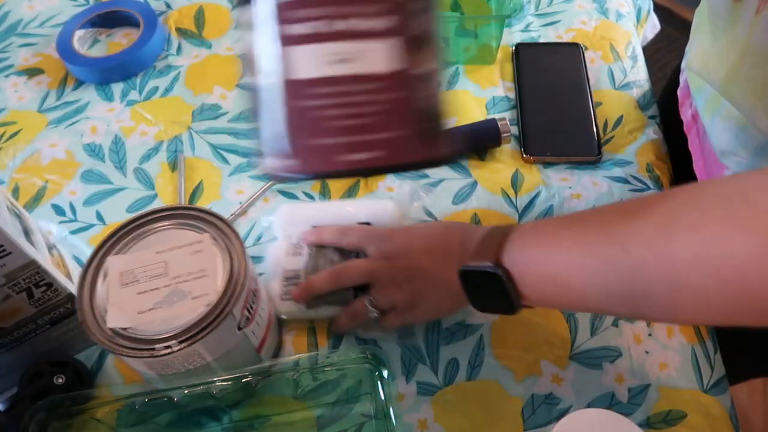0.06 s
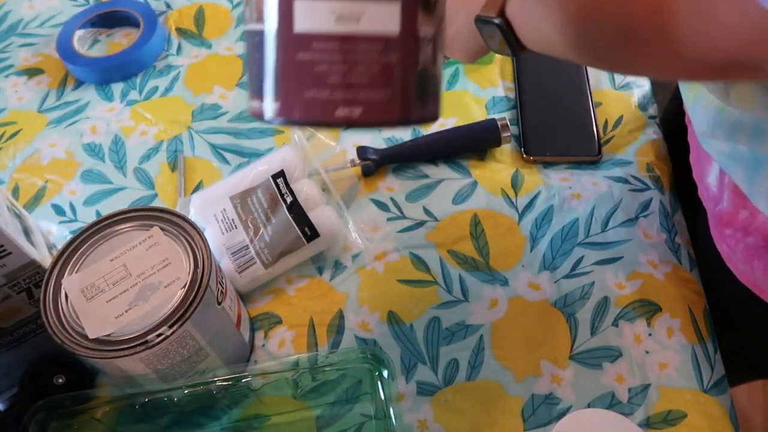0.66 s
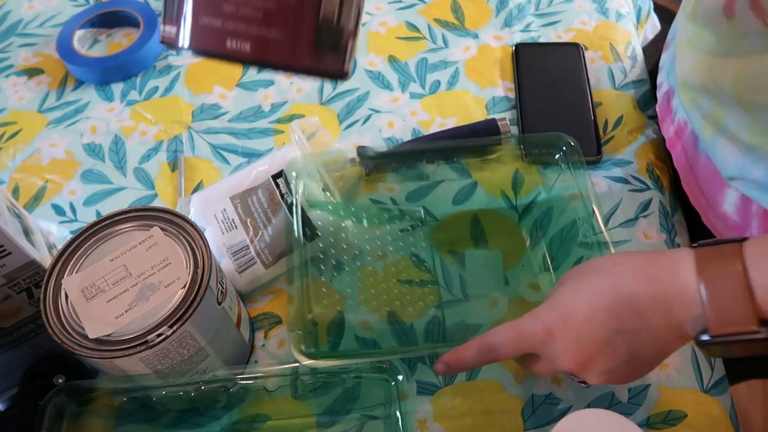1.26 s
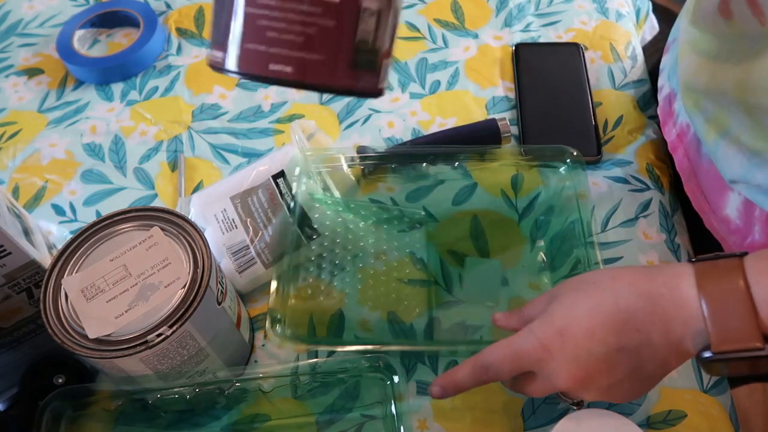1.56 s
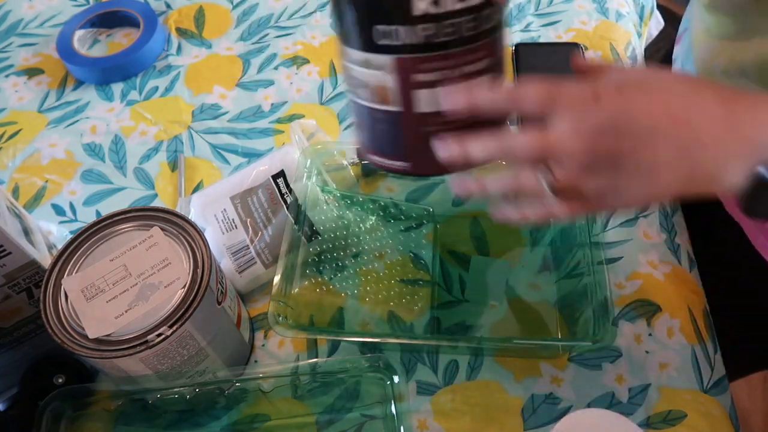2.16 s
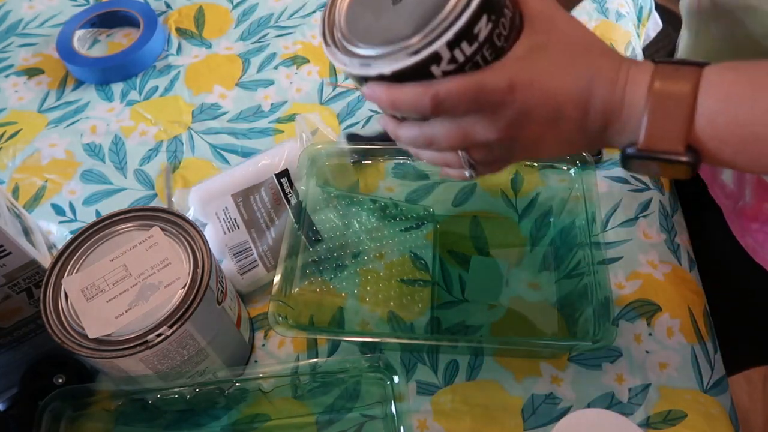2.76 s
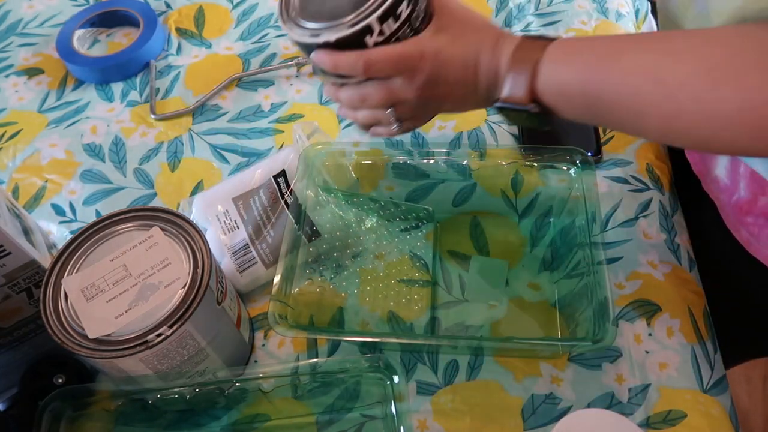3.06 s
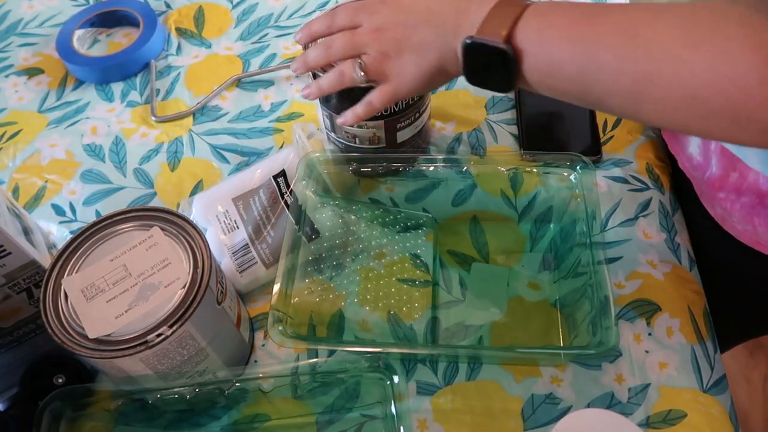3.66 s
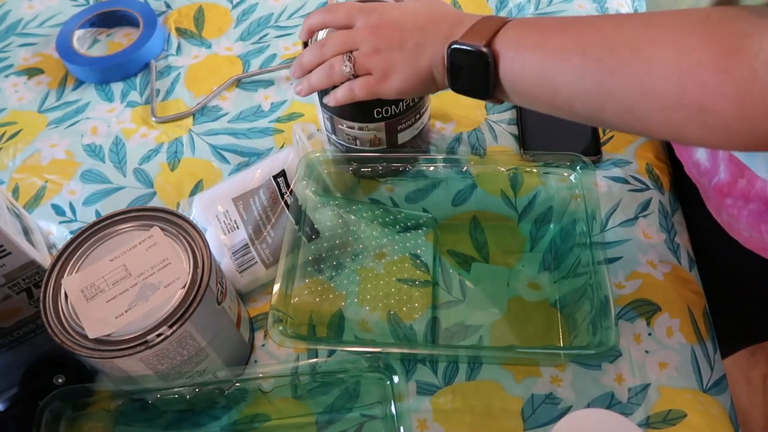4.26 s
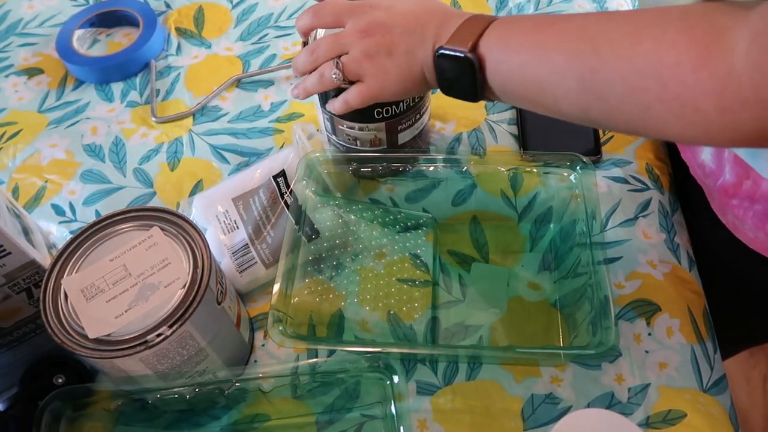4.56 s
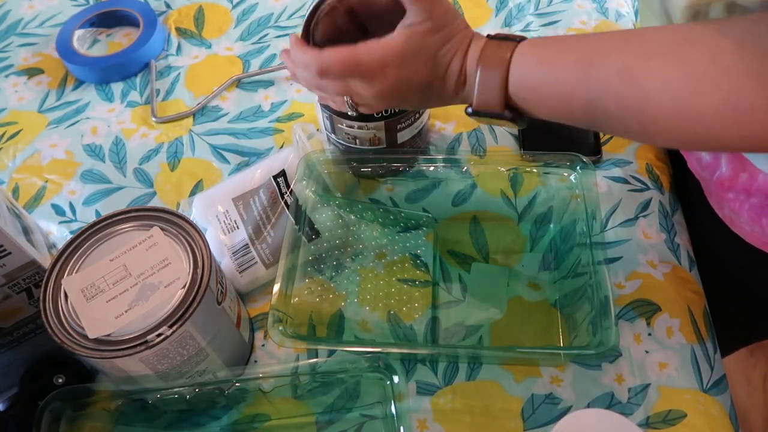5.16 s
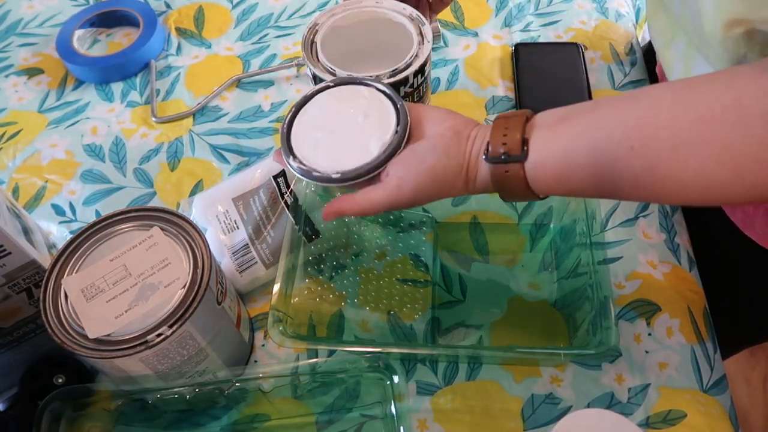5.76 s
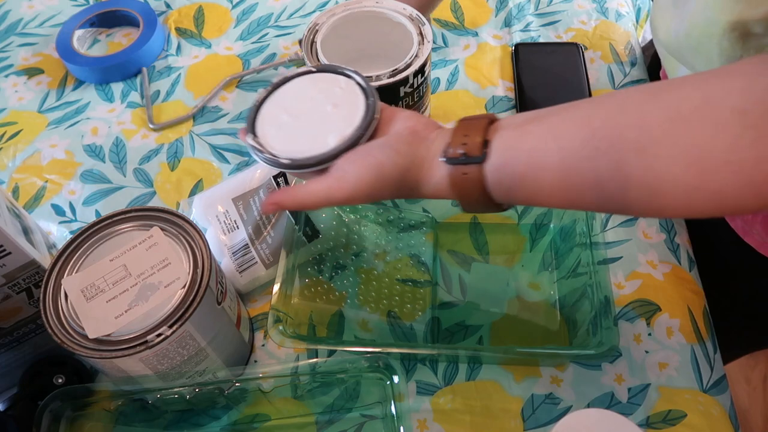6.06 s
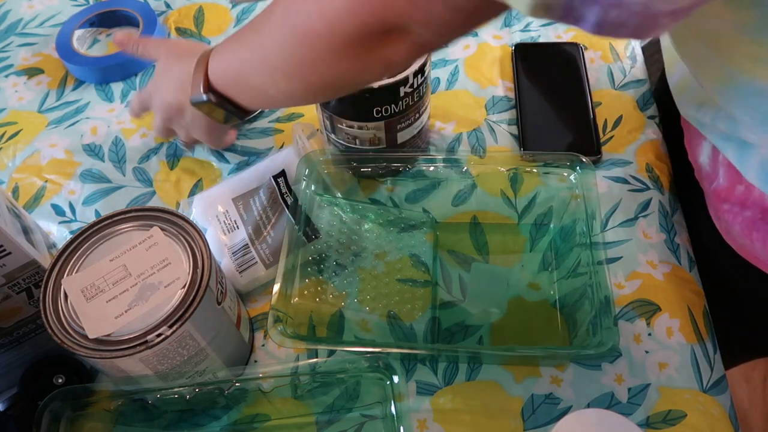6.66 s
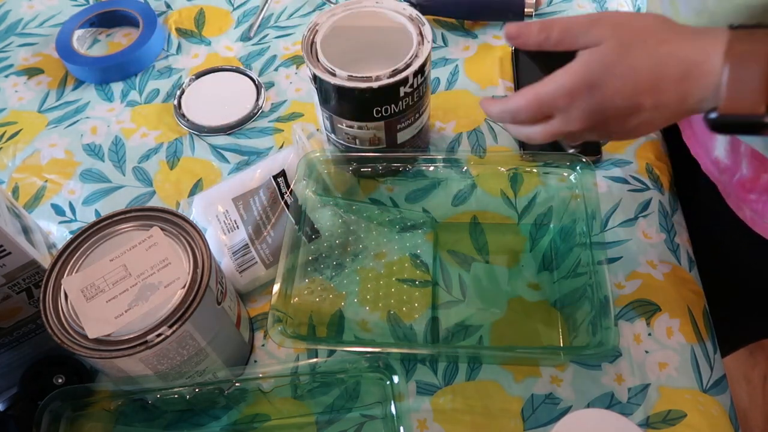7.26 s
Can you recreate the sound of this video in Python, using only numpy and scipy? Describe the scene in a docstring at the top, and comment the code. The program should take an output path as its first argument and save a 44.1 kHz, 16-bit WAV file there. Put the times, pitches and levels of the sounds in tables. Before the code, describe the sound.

For the first second, a wrapped pack scrapes and taps across a cloth-covered table. At about 1.2 seconds a thin plastic tray drops, chatters and rocks to rest by 2 seconds. A full paint can is gripped with dull metal knocks from 2.3 seconds, drags briefly, and lands with a heavy thud near 3.3 seconds. From 3.8 seconds a screwdriver clicks and scrapes under the rim, giving three snaps at about 4.3, 4.5 and 4.7 seconds, the last with a loud, hollow pop. The thin metal lid creaks faintly, then rubs and rings as it is handled, clinking near 6 seconds and settling on the table at 6.7. Around 7.2 seconds the screwdriver clatters loudly down, thumping the tabletop. Everything is close, in a small room, with soft sleeve rustle and a faint, wavering low hum underneath.

```python
"""Opening a paint can

On a cloth-covered table in a small room, a wrapped pack is pushed aside, a thin plastic tray drops
and rocks, and a full paint can is set down. Its lid is prised open with three snaps and a pop, handled
and laid aside; the screwdriver clatters down. Contacts click and ring each object's modes, rubbed
metal sings, heavy blows swing the table top. A low hum wavers underneath."""
import sys
import numpy as np
from scipy import signal
from scipy.fft import rfft, irfft
from scipy.io import wavfile
from scipy.ndimage import uniform_filter1d, minimum_filter1d

SR = 44100
rng = np.random.default_rng(int(sys.argv[2]) if len(sys.argv) > 2 else 0)


def dump(signal):
    """Clip the signal to [-1, 1] and save it as 16-bit WAV at the path in sys.argv[1]."""
    limited = np.clip(np.atleast_2d(signal).T, -1, 1)
    pcm = np.round(limited * 32767).astype(np.int16)
    wavfile.write(sys.argv[1], SR, pcm)


N = 331632
TIME = np.arange(N) / SR


def amp(db):
    """Decibels to gain."""
    return 10 ** (np.asarray(db) / 20)


def unit(x):
    """Scales to unit rms."""
    return x / np.sqrt(np.mean(x ** 2) + 1e-20)


def read(points, hz):
    """Interpolates on a log-frequency axis."""
    freq_hz, value = np.transpose(points)
    return np.interp(np.log(hz + 1), np.log(freq_hz + 1), value)


def add(mix, start_s, sound):
    """Mixes a sound in at start_s."""
    part = mix[max(round(start_s * SR), 0):][:len(sound)]
    part += sound[:len(part)]


def colour(x, spectrum):
    """Zero-phase filter from (freq_hz, gain_db) points."""
    return irfft(rfft(x) * amp(read(spectrum, np.fft.rfftfreq(len(x), 1 / SR))), len(x))


def causal(x, gain_db):
    """Minimum-phase filter: nothing precedes the attack."""
    response = np.exp(np.conj(signal.hilbert(np.log(amp(gain_db)))))
    return np.fft.ifft(np.fft.fft(x) * response).real


def whiten(x, span_hz):
    """Flattens broad bands, keeps fine peaks and dips."""
    bins = rfft(x)
    power = uniform_filter1d(abs(bins) ** 2, max(int(span_hz * len(x) / SR), 1))
    return irfft(bins / np.sqrt(abs(power) + 1e-12), len(x))


# Room noise spectrum: freq_hz, level_db
AIR_SPECTRUM = [(15, -50), (25, -10), (76, -8.5), (141, -6), (170, -11.5), (263, -16.5), (439, -20),
                (988, -27.5), (1100, -28.5), (1440, -29), (2610, -33.5), (12500, -51), (16000, -60)]


def air(level_db=-51):
    """Still room: low rumble under faint hiss."""
    return amp(level_db) * unit(colour(rng.standard_normal(N), AIR_SPECTRUM))


# Electrical whine: pitch_hz, level_db
WHINE_TONES = [(13006, -84)]


def whine():
    """Thin, steady electrical tone."""
    return sum(amp(db) * np.sqrt(2) * np.sin(2 * np.pi * hz * TIME) for hz, db in WHINE_TONES)


# Hum envelope: time_s, level_db
HUM_LEVELS = [(0.0, -44.5), (0.54, -46.5), (1.05, -38), (1.36, -48), (1.72, -40), (2.3, -51), (3.18, -44),
              (3.47, -54), (4.29, -59.5), (4.63, -47.5), (4.98, -47.5), (5.36, -60), (5.7, -53.5),
              (5.95, -44.5), (6.74, -53.5), (7.52, -46)]


def hum(pitch_hz=170.5, waver_hz=2):
    """Low hum that swells, fades and wavers."""
    drift = unit(colour(rng.standard_normal(N), [(6, 0), (25, -30), (100, -90)]))
    envelope = amp(np.interp(TIME, *np.transpose(HUM_LEVELS)))
    phase = 2 * np.pi * np.cumsum(pitch_hz + waver_hz * drift) / SR
    return envelope * np.sqrt(2) * np.sin(phase)


# Reverb decay: freq_hz, t60_s
ROOM_DECAY = [(100, 0.14), (400, 0.35), (1000, 0.33), (3000, 0.47), (7000, 0.32), (14000, 0.27)]
# Reverb tail against direct sound: freq_hz, gain_db
ROOM_SPECTRUM = [(100, 0.5), (300, 1.5), (1000, -7), (2000, -19), (5000, -9.5), (12000, -21)]


def room(x, early_db=-8, early_decay_s=0.03, echoes_per_s=4000):
    """Quick table-top reflections, then a small room's tail."""
    t = np.arange(SR * 3 // 4) / SR
    late, early = rng.standard_normal((2, len(t))) * (rng.random((2, len(t))) < echoes_per_s / SR)
    hz, frame_s, frames = signal.stft(late, SR, nperseg=256)
    decay = amp(-60 * frame_s / read(ROOM_DECAY, hz)[:, None])
    tail = signal.istft(frames * decay, SR, nperseg=256)[1][:len(t)]
    onset = np.clip((t - .004) / 0.0041, 0, 1)
    tail = colour(whiten(tail * onset, span_hz=64.4), ROOM_SPECTRUM)
    early = amp(early_db) * whiten(early * (t > .002) * np.exp(-t / early_decay_s), span_hz=240)
    return signal.fftconvolve(x, (tail + early)[:SR * 2 // 3])[:N]


def ring(modes, size=SR // 3):
    """Free ringing: a sum of decaying modes."""
    t = np.arange(size) / SR
    return sum(amp(db - 60 * t / t60_s) * np.sin(2 * np.pi * hz * t) for hz, db, t60_s in modes)


def friction(slips_per_s, spread_db, hiss_gain, size=N):
    """Tiny uneven slips over smooth hiss."""
    slipping = rng.random(size) < slips_per_s / SR
    strength = amp(spread_db * np.minimum(rng.exponential(1, size), 4))
    slips = slipping * strength * rng.choice([-1, 1], size)
    return unit(unit(slips) + hiss_gain * rng.standard_normal(size))


def stick_slip(depth_db, rate_hz):
    """A dragged thing holds and lets go, so its level clumps."""
    knots_s = np.arange(0, N / SR + 1, 1 / rate_hz)
    return unit(amp(depth_db * np.interp(TIME, knots_s, rng.standard_normal(len(knots_s)))))


def push(start_s, length_s, attack_s=0.042, release_s=0.068):
    """Movement envelope: gathers speed, holds, comes to rest."""
    rise = np.clip((TIME - start_s) / attack_s, 0, 1)
    return rise * np.exp(-np.maximum(TIME - start_s - length_s, 0) / release_s)


# Arm movements: start_s, length_s, level_db
SLEEVE_MOVES = [(0, 2.95, -59.5), (4.06, 2.91, -60), (6.975, 0.6, -58)]


def sleeves():
    """Cloth rustles as the arms move."""
    spectrum = [(150, 2), (500, -4.5), (1500, -7), (3000, -12.5), (6000, -21), (14000, -46)]
    rustle = unit(colour(friction(slips_per_s=930, spread_db=5.5, hiss_gain=0.97), spectrum))
    envelope = sum(amp(db) * push(start_s, length_s) for start_s, length_s, db in SLEEVE_MOVES)
    return rustle * stick_slip(depth_db=3.5, rate_hz=14) * envelope


def crinkles(low_hz=900, high_hz=4500, t60_cycles=14, count=500):
    """Plastic creases buckle, each with its own brief pitch."""
    out = np.zeros(N)
    for when, pitch, strength in rng.random((count, 3)):
        hz = low_hz * (high_hz / low_hz) ** pitch
        crease = ring([(hz, 12 * strength, t60_cycles / hz)], size=1024) / np.sqrt(hz)
        add(out, when * N / SR, crease)
    return unit(out)


def patchy(x, depth_db):
    """Contact points shift, so brief resonances come and go."""
    frames = signal.stft(x, nperseg=512, noverlap=384)[2]
    patches = uniform_filter1d(rng.standard_normal(frames.shape), size=5, axis=0)
    patches = unit(uniform_filter1d(patches, size=7, axis=1))
    return unit(signal.istft(frames * amp(depth_db * patches), nperseg=512, noverlap=384)[1][:len(x)])


# Drags over the cloth: start_s, length_s, body_db, hiss_db
CLOTH_SLIDES = [(-.05, 0.37, -35.5, -52), (0.738, 0.036, -39, -62), (2.759, 0.27, -42, -59.5),
                (6.631, 0.14, -46.5, -62)]
# Drag body spectrum: freq_hz, level_db
SLIDE_SPECTRUM = [(150, -23), (250, -9.5), (580, -14), (651, -5), (821, -10.5), (1010, -1.5), (1600, -7.5),
                  (1960, -7), (3070, -14), (8000, -27.5), (10400, -63.5), (17600, -120)]


def slides():
    """Things drag over the tablecloth with scrape, crinkle and hiss."""
    grain = friction(slips_per_s=1400, spread_db=4.2, hiss_gain=.75)
    grain *= stick_slip(depth_db=2.5, rate_hz=90)
    body = unit(patchy(colour(grain, SLIDE_SPECTRUM), depth_db=3.5) + .45 * crinkles())
    hiss = unit(colour(grain, [(2500, -11), (6500, -10), (12000, 1.5), (16000, -6.5)]))
    return sum(push(start_s, length_s) * (amp(body_db) * body + amp(hiss_db) * hiss)
               for start_s, length_s, body_db, hiss_db in CLOTH_SLIDES)


def touched(modes, detune=0.0024, spread_db=1):
    """Unit-energy ringing; grip and contact point shift each mode slightly."""
    shifts = rng.standard_normal((len(modes), 2))
    body = ring([(hz * (1 + detune * pitch_shift), db + spread_db * level_shift, t60_s)
                 for (hz, db, t60_s), (pitch_shift, level_shift) in zip(modes, shifts)])
    return body / np.linalg.norm(body)


def strikes(hits, spectrum, modes, ring_db, chatter_gain, size=4096):
    """Each contact clicks, chatters and sets the object ringing."""
    out, t, hz = np.zeros(N), np.arange(size) / SR, abs(np.fft.fftfreq(size, 1 / SR))
    grits = rng.standard_normal((len(hits), size))
    for (start_s, level_db, bass_db, treble_db, chatter_s), grit in zip(hits, grits):
        force = chatter_gain * grit * np.exp(-t / max(chatter_s, 1e-4))
        force[0] += 1
        force_db = 10 * np.log10(uniform_filter1d(abs(np.fft.fft(force)) ** 2, size=45, mode="wrap"))
        tilt = [(250, bass_db), (1900, 0), (10000, treble_db)]
        click = causal(force, read(spectrum, hz) + read(tilt, hz) - force_db)
        sound = amp(ring_db) * signal.fftconvolve(click, touched(modes))
        sound[:size] += click
        add(out, start_s, amp(level_db) * sound)
    return out


# Dry rubbing noise: freq_hz, gain_db
SCRAPE_SPECTRUM = [(200, -20), (800, 30.5), (1400, 8.5), (2200, 1), (3400, 7.5), (5400, -9.5), (8000, -4.5),
                   (15000, -4)]


def rubs(strokes, modes, scrape_db, size=16384):
    """Slips on thin metal swell and fade, feeding each mode its share; the modes ring on."""
    out, t, hz = np.zeros(N), np.arange(size) / SR, abs(np.fft.fftfreq(size, 1 / SR))
    rings = [ring([mode]) / np.linalg.norm(ring(modes)) for mode in modes]
    for start_s, length_s, level_db, treble_db in strokes:
        slips = friction(slips_per_s=1600, spread_db=2, hiss_gain=.6, size=size)
        slips *= np.sin(np.pi * np.minimum(t / length_s, 1))
        slips /= np.linalg.norm(slips)
        tilt = [(2000, 0), (5000, treble_db)]
        sound = 0
        for (mode_hz, _, _), ringing in zip(modes, rings):
            driven = signal.fftconvolve(slips, ringing)
            share = amp(read(tilt, mode_hz)) * np.linalg.norm(ringing)
            sound += share * driven / np.linalg.norm(driven)
        sound[:size] += causal(slips, scrape_db + read(SCRAPE_SPECTRUM, hz) + read(tilt, hz))
        add(out, start_s, amp(level_db) * np.sqrt(length_s * SR / 2) * sound)
    return out


def radiate(swing, rise_s=0.00096, low_cut_hz=90):
    """A small panel takes a moment to move and radiates little deep bass."""
    rise = 1 - np.exp(-np.arange(len(swing)) / SR / rise_s)
    return signal.sosfilt(signal.butter(2, low_cut_hz, "high", fs=SR, output="sos"), rise * swing)


# Weight landing on the table: start_s, level_db, pitch_hz, ring_db
TABLE_BLOWS = [(0.783, -19.5, 138, -19), (1.195, -14, 111, -9), (2.837, -14.5, 281, -15),
               (3.059, -7, 320, -21.5), (3.061, -15, 119, -4.5), (3.2941, 6.5, 272, -9),
               (3.348, -6, 225, -15), (4.52, -18.5, 224, -18), (6.698, -17.5, 278, -15),
               (6.708, -14, 173, -13), (7.2209, -10, 192, -7.5), (7.2556, -0.5, 297, -13),
               (7.41, -14, 310, -14.5)]
# Table-top modes: pitch_hz, level_db, t60_s
TABLE_MODES = [(107, -4, .18), (220, 2, .19), (292, -8, .17), (380, -11, .15), (490, -16, .16),
               (673, -22, .12)]


def table_thuds(t60_cycles=8):
    """Heavy blows swing the table top for a few cycles and leave it ringing."""
    out, ringing = np.zeros(N), ring(TABLE_MODES)
    for start_s, level_db, pitch_hz, ring_db in TABLE_BLOWS:
        swing = ring([(pitch_hz, 0, t60_cycles / pitch_hz)]) + amp(ring_db) * ringing
        add(out, start_s, amp(level_db) * radiate(swing))
    return out


# Pack contacts: start_s, level_db, bass_db, treble_db, chatter_s
PACK_HITS = [(.021, 2.5, 10, 20.5, 0.0058), (.04, 1, 9, -7, 0.0037), (.0868, 3, 3, -22, 0.0091),
             (.1836, 11, -22, -21, 0.0038), (.2412, 16.5, -1.5, 2, 0.0018), (.364, -13, 1, 27, 0.0037),
             (.378, -7, -2, 24, .003), (.4478, 0.5, 11, 8, 0.0097), (.5282, 11.5, -17, -7, 0.002),
             (.7268, 6, 9.5, -13, 0.017), (.8091, 4, 13.5, -20, 0.0074)]
# Pack click: freq_hz, gain_db
PACK_SPECTRUM = [(40, -29), (350, -14), (560, -2), (900, -7), (1400, -15), (2050, 2), (2600, -4),
                 (3300, -6), (4100, -25), (16000, -42)]
# Pack modes: pitch_hz, level_db, t60_s
PACK_MODES = [(550, 0, .035), (1950, 4, .04), (2300, 6, .022), (3030, 3, .025), (3420, 3, .02)]


def pack():
    """The wrapped pack taps and barely rings."""
    return strikes(PACK_HITS, PACK_SPECTRUM, PACK_MODES, ring_db=-18.5, chatter_gain=0.37)


# Tray contacts: start_s, level_db, bass_db, treble_db, chatter_s
TRAY_BOUNCES = [(1.1966, 23, 1.5, 14.5, 0.0026), (1.2025, 13.5, 8.5, -4, 0.0019),
                (1.2112, 13.5, 15, -12, 0.0047), (1.2255, 15.5, 2, -10, 0.0043), (1.2385, 0, 12, -16, .008),
                (1.2625, -2.5, 9, -14, 0.0045), (1.3173, 0, 6, 2, 0.0058), (1.3634, 16, -6.5, 3, 0.0026),
                (1.477, 11.5, -6, 1.5, 0.0064), (1.5814, 1, -7, -5, 0.033), (1.6768, 0.5, -36, -9, 0.007),
                (1.9038, 6.5, -43, 7.5, 0.018), (2.078, -24.5, -20, 35, 0.0016)]
# Tray click: freq_hz, gain_db
TRAY_SPECTRUM = [(40, -18.5), (270, -3.5), (400, 3.5), (800, 4.5), (1300, 0), (1900, 1), (4500, -21.5),
                 (16000, -54.5)]
# Tray modes: pitch_hz, level_db, t60_s
TRAY_MODES = [(107, 4, .12), (310, -7, .08), (355, -2, .07), (420, 6, .055), (565, -5, .09), (610, -4, .09),
              (655, -1, .08), (705, -1, .09), (790, 6, .11), (848, 6, .11), (965, 2, .1), (1114, 3, .07),
              (1650, -2, .05), (2300, -1, .07)]


def tray():
    """Thin plastic drops, chatters and rocks to rest."""
    return strikes(TRAY_BOUNCES, TRAY_SPECTRUM, TRAY_MODES, ring_db=-16, chatter_gain=0.84)


# Screwdriver contacts: start_s, level_db, bass_db, treble_db, chatter_s
TOOL_BOUNCES = [(7.0488, 0.34, -64, 8.5, 0.003), (7.2197, 33.2, -10, 2.5, 0.0013),
                (7.2226, 27, -11.5, -19, 0.0004), (7.233, 5.3, 10, -13, 0.0064),
                (7.243, 31.4, -0.5, -1, 0.0021), (7.2462, 23.2, 8, -9, 0.00087),
                (7.255, 9.1, 10.5, -10, 0.025)]
# Screwdriver click: freq_hz, gain_db
TOOL_SPECTRUM = [(40, -25.5), (320, -1), (700, -1.5), (900, -6), (1600, 3.5), (2200, -2), (2800, -10.5),
                 (4000, -25), (5500, -30), (9000, -47.5), (16000, -53)]
# Handle modes: pitch_hz, level_db, t60_s
HANDLE_MODES = [(716, 0, 0.049), (1130, 9.5, 0.022), (1560, -6, 0.021), (2130, -3, 0.011)]


def screwdriver():
    """The screwdriver clatters onto the table; its handle rings briefly."""
    return strikes(TOOL_BOUNCES, TOOL_SPECTRUM, HANDLE_MODES, ring_db=-23, chatter_gain=0.35)


# Can contacts: start_s, level_db, bass_db, treble_db, chatter_s
CAN_KNOCKS = [(2.3312, 9.5, 3, 0.5, 0.0017), (2.4252, 14, 0.5, 7, 0.0022), (2.8192, 15.5, -25.5, -9, 0.009),
              (2.923, 4.5, -5, -2.5, .004), (2.961, -7, 4, -11, 0.0049), (3.0452, 3, -8.5, 9.5, 0.018),
              (3.2161, 1.5, 10.5, 0, 0.0017), (3.2413, 22, 2, 4, 0.0056),
              (3.2525, 21.5, 8.5, -23.5, 0.0012), (3.437, -7, 0, 4, 0.0088)]
# Can click: freq_hz, gain_db
CAN_SPECTRUM = [(40, -21), (370, -22.5), (560, -6), (730, -9.5), (1000, -0.5), (1350, -5), (1850, 1.5),
                (2900, -9), (3800, -17), (6800, -29.5), (9500, -26), (16000, -35.5)]
# Rubs on the can: start_s, length_s, level_db, treble_db
CAN_STROKES = [(2.37, 0.045, -46.5, -7), (2.405, 0.025, -37, 0), (2.74, 0.039, -49, -10.5)]
# Full can modes: pitch_hz, level_db, t60_s
CAN_MODES = [(545, 0, .07), (680, -7, .06), (975, 3, .075), (1080, -2, .045), (1260, -6, .04),
             (1540, -3, .035), (1830, 5, .04), (2190, 1, .035), (2600, -1, .02)]


def can():
    """The full can is gripped and set down; its ring dies fast."""
    knocks = strikes(CAN_KNOCKS, CAN_SPECTRUM, CAN_MODES, ring_db=-16, chatter_gain=0.63)
    return knocks + rubs(CAN_STROKES, CAN_MODES, scrape_db=-20)


# Rim catches: start_s, length_s, level_db, treble_db
SQUEAK_STROKES = [(2.737, 0.013, -43.5, 7), (2.93, 0.16, -45, -1), (4.726, 0.0045, -14, -1),
                  (6.122, 0.0042, -31, 0), (6.13, 0.041, -47, 12), (6.653, 0.018, -35, -20),
                  (6.68, 0.019, -34, -4), (6.76, 0.073, -50.5, 10)]
# Squeak modes: pitch_hz, level_db, t60_s
SQUEAK_MODES = [(1250, 3.5, 0.01), (1400, 16, 0.034), (2140, -3.5, 0.016), (3080, -4, 0.037)]


def rim_squeaks():
    """A rim catches on cloth or metal."""
    return rubs(SQUEAK_STROKES, SQUEAK_MODES, scrape_db=-20)


# Lid turns: start_s, length_s, level_db, treble_db
CREAK_STROKES = [(4.91, 0.039, -52, 5), (4.997, 0.033, -48.5, -15), (5.07, 0.042, -53.5, -14),
                 (5.155, 0.027, -56, 16.5)]
# Creak modes: pitch_hz, level_db, t60_s
CREAK_MODES = [(1450, -10, 0.013), (1556, 6.5, 0.036), (1870, 6, 0.047), (2270, -23, .012)]


def lid_creaks():
    """The lid rubs as it is eased out of its groove."""
    return rubs(CREAK_STROKES, CREAK_MODES, scrape_db=-17.5)


# Lid contacts: start_s, level_db, bass_db, treble_db, chatter_s
LID_TAPS = [(5.2749, -10, 24.5, -5, 0.004), (5.318, 6, 5, 0, 0.0018), (6.0428, 23, -3.5, 9, 0.0098),
            (6.141, 0, 3, 7, 0.0027), (6.168, -5, -2, 9, 0.0036), (6.6871, 6, 1, 9, 0.013)]
# Lid click: freq_hz, gain_db
LID_SPECTRUM = [(40, -18), (230, -8.5), (450, -24), (690, -6.5), (1000, -28), (1400, -12), (1680, -8.5),
                (1900, 0.5), (2150, -6.5), (2500, -14), (2900, -7.5), (3300, -24), (3600, -18),
                (4600, -28.5), (5300, -27), (5800, -30.5), (10000, -35.5), (16000, -54)]
# Rubs on the lid: start_s, length_s, level_db, treble_db
LID_STROKES = [(5.24, 0.11, -45, -13), (5.314, 0.009, -30.5, -10), (5.633, 0.011, -30.5, -12),
               (5.636, 0.066, -33, -9.5), (5.752, 0.065, -31.5, -8), (5.763, 0.023, -28.5, -3),
               (5.81, 0.016, -38, -24)]
# Free lid modes: pitch_hz, level_db, t60_s
LID_MODES = [(762, -3, .14), (800, -6, .12), (850, -4, .13), (915, 0, .15), (1122, -3, .12),
             (1286, -6, .18), (1535, -8, .26), (1944, 4, .23), (1997, 1, .22), (2108, 4, .11),
             (2155, 1, .1), (2200, 1, .32), (2490, -6, .1), (2680, -10, .12), (3130, 0, .05),
             (3222, 3, .13), (3490, 2, .09), (4000, -3, .11), (4300, -7, .06), (4530, -3, .12),
             (5200, 0, .04), (5370, -2, .05), (6700, -10, .05)]


def loose_lid():
    """The thin metal lid rings as it is handled and laid aside."""
    taps = strikes(LID_TAPS, LID_SPECTRUM, LID_MODES, ring_db=-19, chatter_gain=0.2)
    return taps + rubs(LID_STROKES, LID_MODES, scrape_db=-22)


# Prying contacts: start_s, level_db, bass_db, treble_db, chatter_s
PRY_SNAPS = [(3.8135, 0.5, 0, -45, 0.0065), (3.8407, -8, 1, 18, 0.0029), (3.8602, 8, -6, -32, 0.0046),
             (4.0552, -17.5, 13.5, -26.5, 0.0019), (4.2533, 13.5, -7, 16, 0.0022),
             (4.2582, 13, -3, -17, 0.0023), (4.5192, 17, 0, 7.5, 0.0025), (4.6528, 5.5, -10, -2, 0.0022),
             (4.71, 17, 9, -7, 0.0024), (4.8683, -2, -44, -17, 0.016)]
# Rim click: freq_hz, gain_db
RIM_SPECTRUM = [(40, -55), (120, -25), (220, -5), (400, -11), (750, 0.5), (1900, 1), (2450, -3.5),
                (2950, -2), (3700, -9), (4800, -10), (16000, -40)]
# Blade under the rim: start_s, length_s, level_db, treble_db
PRY_STROKES = [(3.82, 0.095, -65, -10), (4.14, 0.048, -41.5, -36), (4.19, 0.065, -48.5, -16)]
# Rim modes: pitch_hz, level_db, t60_s
RIM_MODES = [(383, -15, .15), (530, -8, .1), (655, -2, .12), (678, 1, .26), (720, -3, .08), (855, -2, .11),
             (977, 0, .1), (1266, -6, .06), (1375, -1, .06), (1762, -4, .06), (2032, -4, .07),
             (2640, 0, .035), (2950, 8, .016), (3540, 0, .02)]


def prying():
    """The screwdriver scrapes under the rim, which gives in snaps."""
    snaps = strikes(PRY_SNAPS, RIM_SPECTRUM, RIM_MODES, ring_db=-13, chatter_gain=1.0)
    return snaps + rubs(PRY_STROKES, RIM_MODES, scrape_db=-31)


def lid_pop(start_s=4.7102, level_db=4, pitch_hz=317.5, glide_hz_per_s=520,
            t60_s=0.033, tail_db=-18, tail_t60_s=0.26):
    """The lid springs free: air in the can bounces hard, then rings on, rising as the mouth opens."""
    out, t = np.zeros(N), np.arange(SR // 3) / SR
    fade = amp(-60 * t / t60_s) + amp(tail_db - 60 * t / tail_t60_s)
    phase = 2 * np.pi * np.cumsum(pitch_hz + glide_hz_per_s * t) / SR
    add(out, start_s, amp(level_db) * radiate(fade * np.sin(phase)))
    return out


# Side against mid for direct sound, reverb and room noise: freq_hz, gain_db
DIRECT_SIDE = [(100, -49), (400, -27.5), (1000, -34), (2200, -24.5), (5000, -6.5), (10000, -2.5)]
ROOM_SIDE = [(70, -32.5), (300, -28), (1000, -22.5), (2200, -14.5), (5000, -2), (10000, 5.5)]
AIR_SIDE = [(70, -21), (300, 2.5), (800, 1.5), (16000, 0)]


def scene(thud_send_db=-7, tool_send_db=4):
    """Stereo mix: sources near the middle, reverb and hiss wider."""
    handling = pack() + tray() + can() + prying() + loose_lid()
    handling += lid_creaks() + rim_squeaks() + slides() + sleeves()
    thumps = table_thuds() + lid_pop()
    clatter = screwdriver()
    direct = handling + thumps + clatter
    # The close table top barely stirs the room; the clatter fills it.
    send = handling + amp(thud_send_db) * thumps + amp(tool_send_db) * clatter
    mid = direct + room(send) + hum() + whine() + air()
    # Two close microphones: phase-shifted direct sound, separate reverb.
    side = colour(signal.hilbert(direct).imag, DIRECT_SIDE)
    side += colour(room(send), ROOM_SIDE) + colour(air(), AIR_SIDE)
    return np.array([mid + side, mid - side])


def duck(x, threshold_db=-16, attack_s=0.066, recover_db_per_s=7):
    """Gain control: drops fast on loud blows, recovers slowly."""
    pole = np.exp(-1 / (attack_s * SR))
    power_db = 10 * np.log10(signal.lfilter([1 - pole], [1, -pole], (x ** 2).mean(0)) + 1e-12)
    recovery_db = recover_db_per_s * TIME
    held_db = np.maximum.accumulate(power_db + recovery_db) - recovery_db
    return x * amp(-np.maximum(held_db - threshold_db, 0))


def limit(x, hold_s=0.00068):
    """Fast limiter: rounds swings above full scale."""
    span = int(hold_s * SR)
    gain = minimum_filter1d(1 / np.maximum(abs(x).max(0), 1), span)
    return x * uniform_filter1d(uniform_filter1d(gain, span // 2), span // 2)


# Overall tone, deep bass and highest treble softened: freq_hz, gain_db
BAND_EDGES = [(20, -12), (60, -2), (120, -0.5), (10000, 0), (13500, -1), (16000, -15.5)]


def record(dry, cutoff_hz=16000):
    """Gain control, softened deep bass and highest treble, limiter, low-pass."""
    softened = np.array([colour(channel, BAND_EDGES) for channel in duck(dry)])
    low_pass = signal.firwin(511, cutoff_hz, window=("kaiser", 10), fs=SR)
    return signal.oaconvolve(limit(softened), low_pass[None], "same")


dry = scene()
out = record(dry)
dump(out)
```